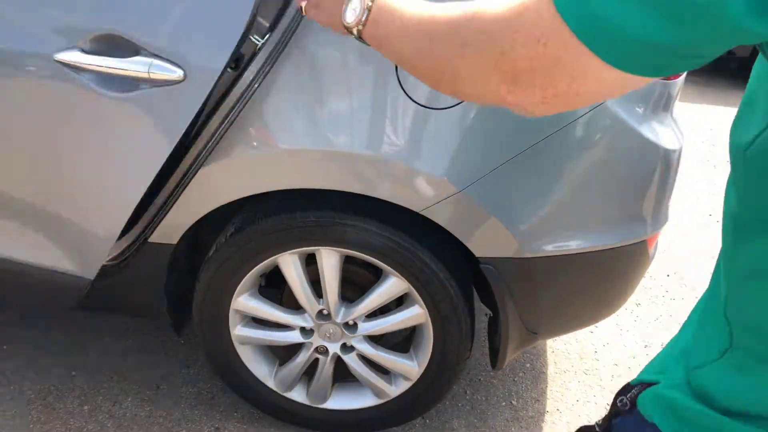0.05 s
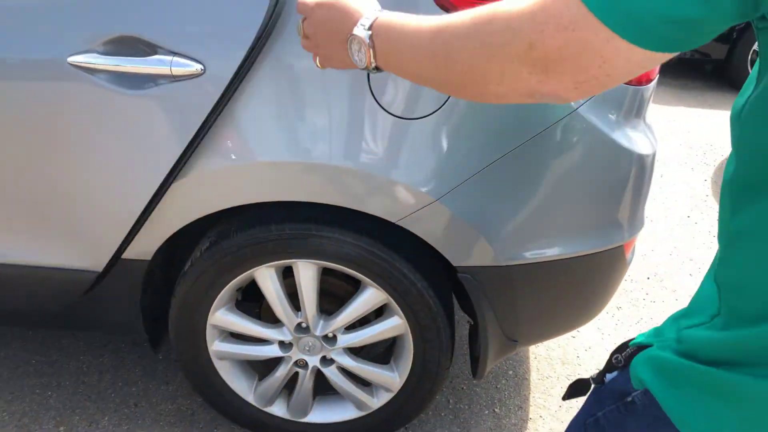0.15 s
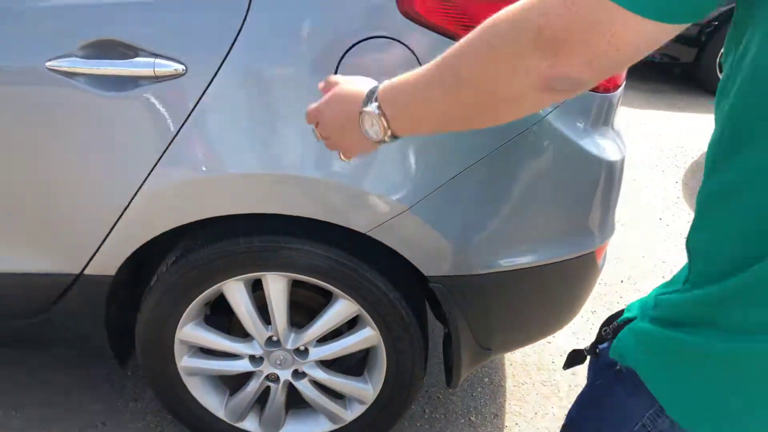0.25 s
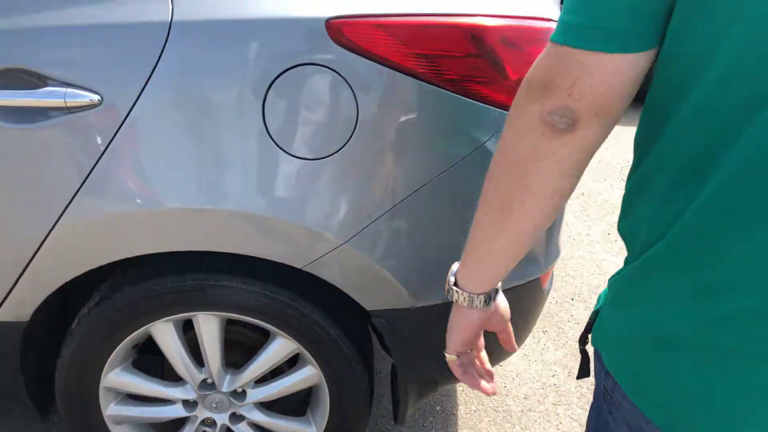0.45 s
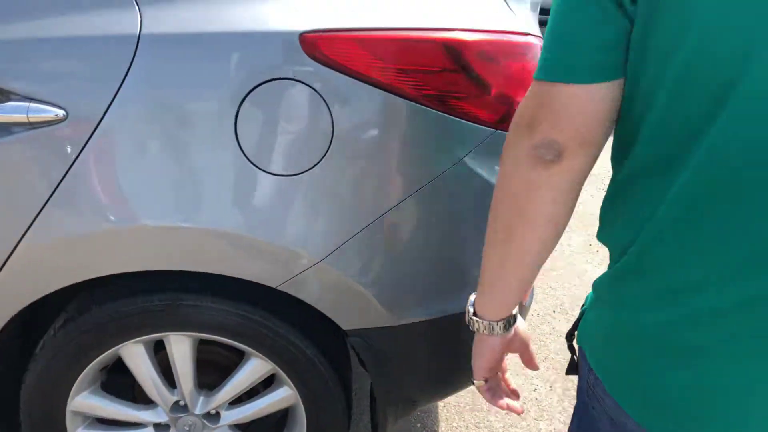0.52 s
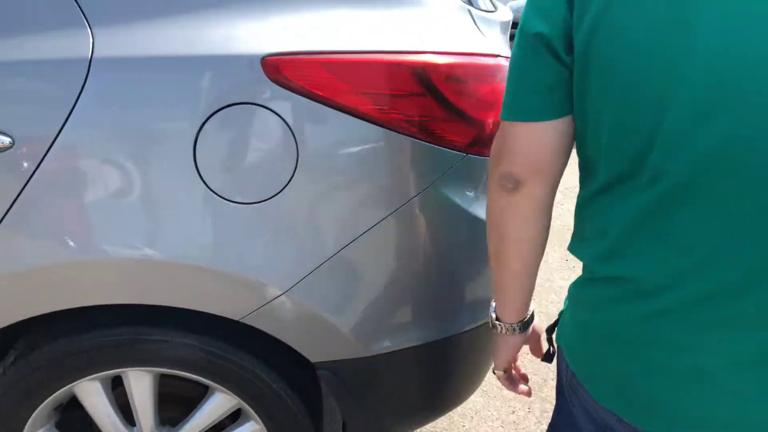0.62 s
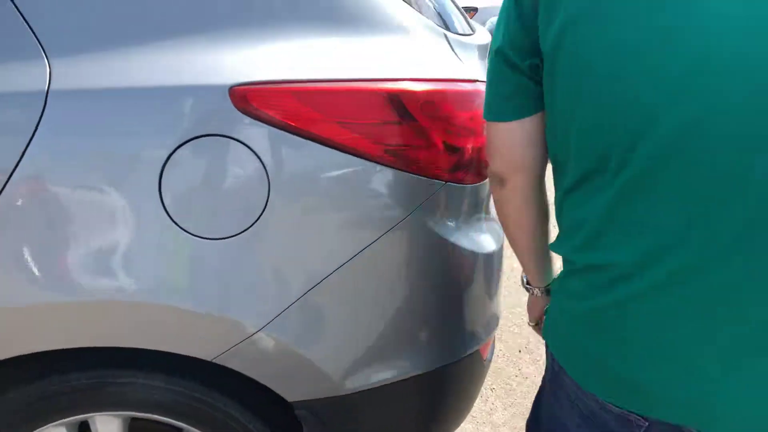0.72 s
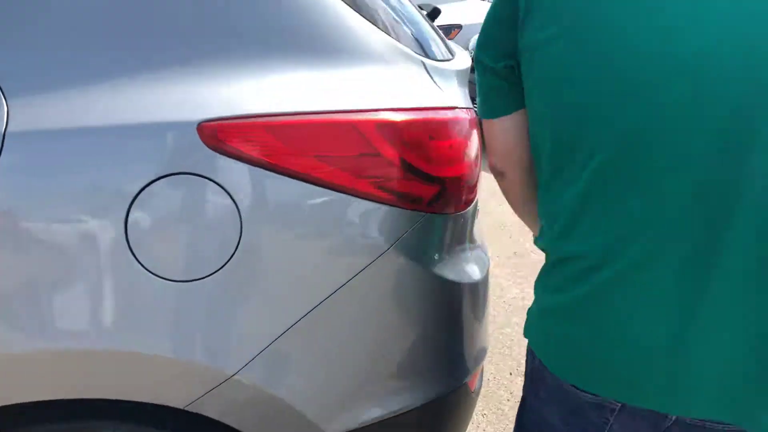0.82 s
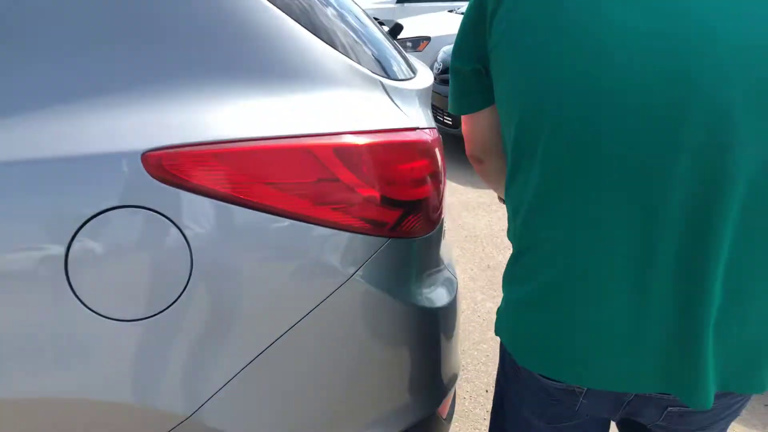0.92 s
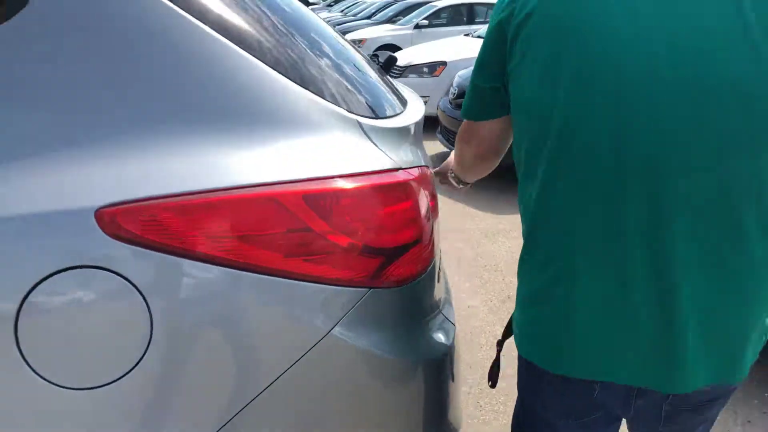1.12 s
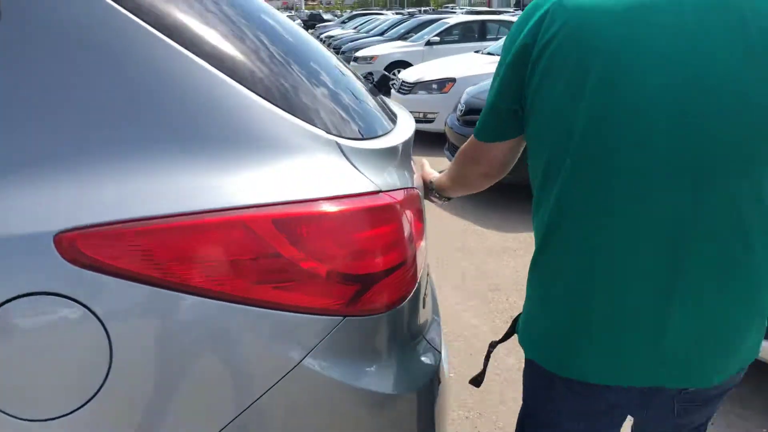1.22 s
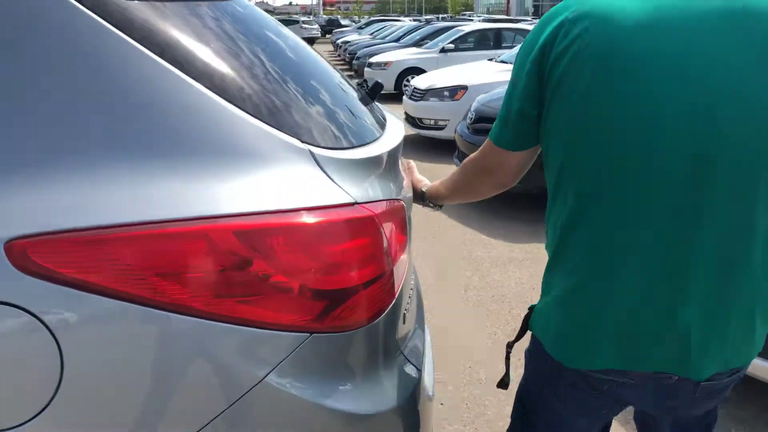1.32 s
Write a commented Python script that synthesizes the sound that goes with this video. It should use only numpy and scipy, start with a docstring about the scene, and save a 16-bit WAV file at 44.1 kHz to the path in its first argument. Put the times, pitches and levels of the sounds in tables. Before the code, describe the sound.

A car door is shut once close by, with a bright latch crunch and a deep, heavy thud. Distant traffic and an idling engine rumble steadily outdoors, and a faint shoe scuff and clothes rustle follow.

```python
"""Car door shut in a car park

A rear door is pushed shut about a metre away. It brushes its seal, the latch snaps in with a bright
crunch and the steel panels clunk; the body booms twice as the door seats and rebounds.
Far traffic and an idling engine rumble throughout, while clothes rustle and a shoe scuffs the asphalt.
Gain control ducks the whole scene on the slam and lets it creep back."""
import sys
import numpy as np
from scipy import signal
from scipy.fft import rfft, irfft
from scipy.io import wavfile

SR = 44100
rng = np.random.default_rng(int(sys.argv[2]) if len(sys.argv) > 2 else 0)


def bounce(signal):
    """Save signal as a 16-bit WAV file at the path given by the first command-line argument."""
    frames = np.transpose(np.atleast_2d(signal))
    limited = np.clip(frames, -1, 1)
    pcm = np.round(limited * 32767).astype(np.int16)
    wavfile.write(sys.argv[1], SR, pcm)


N = 59535
TIME = np.arange(N) / SR

# the door meets seal, latch and frame: t/s, level/dB, extra crunch/dB
DOOR_CONTACTS = [(.2272, -12.5, -6), (.2366, -14.5, 10), (0.2407, -8, 9.5), (.2460, 0, 4.5),
                 (0.2493, -0.5, -3), (0.2513, -5, 10), (.2695, -16, 11.5)]


def from_db(db):
    """Decibels to gain."""
    return 10 ** (np.asarray(db) / 20)


def unit_rms(x):
    """Scale to an rms of 1."""
    return x / np.sqrt(np.mean(x ** 2) + 1e-20)


def drift(rate_hz):
    """A smooth random wander, rms 1."""
    hop, settle = 100, 1000
    pole = np.exp(-2 * np.pi * rate_hz * hop / SR)
    white = rng.standard_normal(N // hop + settle + 2)
    slow = signal.lfilter([1], [1, -2 * pole, pole * pole], white)[settle:]
    return np.interp(np.arange(N) / hop, np.arange(len(slow)), unit_rms(slow))


def noise(colour):
    """Steady noise, rms 1, shaped by an EQ curve and rolled off below its first point."""
    hz, db = np.transpose(colour)
    bin_hz = np.maximum(np.arange(N // 2 + 1) * SR / N, 1)
    gain = from_db(np.interp(np.log(bin_hz), np.log(hz), db)) * np.minimum(bin_hz / hz[0], 1) ** 2
    return unit_rms(irfft(rfft(rng.standard_normal(N)) * gain, N))


def since(start):
    """Seconds since the start, zero before it."""
    return np.maximum(TIME - start, 0)


def decay(start, t60):
    """An envelope that jumps to 1, then falls 60 dB in t60 seconds."""
    return (TIME >= start) * np.exp(-np.log(1000) * since(start) / t60)


def burst(start, attack, t60):
    """A decay softened by a linear attack; times in seconds."""
    return np.minimum(since(start) / attack, 1) * decay(start, t60)


def ring(clicks, hz, t60):
    """A resonator: each click starts a dying sine of its own height."""
    pole, step = np.exp(-np.log(1000) / (t60 * SR)), 2 * np.pi * hz / SR
    return signal.lfilter([0, np.sin(step)], [1, -2 * pole * np.cos(step), pole * pole], clicks + 1e-18)


def panel_clunk(slam_s=0.2445):
    """The seal cushions the slam: each panel mode swells, then is damped by the rubber."""
    # door panel modes: f/Hz, level/dB, swell/s, t60/s
    panel_modes = [(172, -29, 0.0042, 0.092), (259.5, -15, 0.011, 0.052), (472, -12, 0.0058, 0.026),
                   (782, -18, 0.0049, 0.019)]
    age = since(slam_s)
    out = np.zeros(N)
    for hz, db, swell, t60 in panel_modes:
        attack = np.sin(np.pi / 2 * np.minimum(age / swell, 1)) ** 2
        damping = np.exp(-np.log(1000) * since(slam_s + swell) / t60)
        out += from_db(db) * attack * damping * np.sin(2 * np.pi * hz * age)
    return out


def steel_ring(spread_db=3):
    """Every contact rings the skin and latch, striking each mode with a slightly random strength."""
    # modes of the steel skin and latch: f/Hz, level/dB, t60/s
    steel_modes = [(206.4, -32.5, .28), (250.2, -31.5, .2), (409.4, -34, 0.17), (459, -28.5, 0.27),
                   (495, -36, .2), (795, -33, 0.27), (825, -38, 0.11), (975, -37, 0.12), (1405, -27, 0.038),
                   (1700, -42, 0.064), (2102, -39.5, 0.066), (2224, -36, 0.1), (2340, -36, .11),
                   (2390, -52, 0.068), (2805, -48, .07), (3125, -42.5, 0.096), (3503, -37, 0.044)]
    starts, contact_db, _ = np.transpose(DOOR_CONTACTS)
    out = np.zeros(N)
    for hz, mode_db, t60 in steel_modes:
        strike_db = contact_db + mode_db + spread_db * rng.standard_normal(len(starts))
        clicks = np.zeros(N)
        clicks[(starts * SR).astype(int)] = from_db(strike_db)
        out += ring(clicks, hz, t60)
    return out


def latch_crunch(attack_s=0.0022, trim_cutoff_hz=6100):
    """Each contact builds to a short bright crunch and leaves a duller shake of the trim."""
    # colour of latch and trim: f/Hz, relative level/dB
    crunch_colour = [(300, 4), (480, 2), (610, 1), (760, 9), (1050, 3), (2400, -1.5), (3600, -11.5),
                     (5000, -16.5), (7200, -14), (8500, -19.5), (12000, -16.5), (16000, -31)]

    def hits(t60):
        """One burst per contact, summed in power."""
        return np.sqrt(sum((from_db(db + extra_db) * burst(start, attack_s, t60)) ** 2
                           for start, db, extra_db in DOOR_CONTACTS))

    crunch = from_db(-24.5) * hits(t60=0.019) * noise(crunch_colour)
    lowpass = signal.butter(1, trim_cutoff_hz, fs=SR, output="sos")
    trim = from_db(-37) * hits(t60=0.19) * signal.sosfilt(lowpass, noise(crunch_colour))
    return crunch + trim


def body_boom(swell_s=0.01717, sharpness=8, overtone_ratio=2.08, overtone_db=-15):
    """The door pushes cabin air and body into two deep, brief swells; a low shudder dies slowly."""
    # the door seats, then rebounds: t/s, f/Hz, level/dB
    booms = [(0.2474, 68, -5.5), (.2820, 71.6, -11.5)]
    # colour of the shuddering body: f/Hz, relative level/dB
    shudder_colour = [(40, -14), (60, -8), (85, -1.5), (120, -5), (165, -9), (240, -21), (340, -49),
                      (640, -59.5)]
    out = from_db(-28) * noise(shudder_colour) * burst(start=0.252, attack=0.019, t60=1.28)
    for start, hz, db in booms:
        progress = since(start) / swell_s
        swell = (progress * np.exp(1 - progress)) ** sharpness   # peaks swell_s after the start
        phase = 2 * np.pi * hz * since(start)
        tone = np.sin(phase) + from_db(overtone_db) * np.sin(overtone_ratio * phase)
        out += from_db(db) * swell * tone
    return out


def door_hollow():
    """The hollow of the door gives a brief boxy hum on the rebound."""
    # colour of the cavity: f/Hz, relative level/dB
    cavity_colour = [(150, -23), (205, -1), (270, 9), (340, -10), (420, 1.5), (490, -3), (600, -11.5),
                     (1200, -49)]
    return from_db(-26.5) * noise(cavity_colour) * burst(start=0.2643, attack=0.013, t60=0.28)


def metal_chinks():
    """A small loose piece of metal rings as the door swings and again as it rebounds."""
    # knocks on the loose piece: t/s, level/dB
    chinks = [(0.058, -36), (0.2917, -37)]
    # its modes: f/Hz, level/dB, t60/s
    chink_modes = [(3910, -4, .05), (7050, -12, .025)]
    return sum(from_db(db + mode_db) * decay(start, t60) * np.sin(2 * np.pi * hz * since(start))
               for start, db in chinks for hz, mode_db, t60 in chink_modes)


def shoe_scuffs():
    """A sole drags grit over the asphalt in short bright scrapes."""
    # scrapes: t/s, level/dB, t60/s
    scuffs = [(.689, -45, 0.012), (0.6969, -39, 0.017), (0.7, -45, 0.023), (.7085, -42, 0.082),
              (1.082, -51.5, 0.094)]
    # colour of the grit: f/Hz, relative level/dB
    grit_colour = [(1500, -10), (3700, -10), (4400, 12.5), (5200, -2), (6000, -5), (9000, -13),
                   (16000, -13)]
    return noise(grit_colour) * sum(from_db(db) * decay(start, t60) for start, db, t60 in scuffs)


def clothes_rustle():
    """Cloth brushes on cloth in faint, airy swishes."""
    # bell-shaped swishes: t/s, level/dB, half-width/s
    swishes = [(0.057, -54, 0.0064), (0.463, -58, 0.023), (0.559, -57.5, 0.011), (0.72, -61, 0.02),
               (0.748, -60, .005), (1.087, -66, 0.0093), (1.286, -69, .04)]
    # colour of the cloth: f/Hz, relative level/dB
    cloth_colour = [(2000, -10), (5000, 9.5), (9000, 1), (13000, 8), (16000, -8)]
    envelope = sum(from_db(db) * np.exp(-((TIME - peak) / half) ** 2) for peak, db, half in swishes)
    return noise(cloth_colour) * envelope


def far_traffic(corner_s=0.823, crossfade_s=0.28):
    """A steady far roar that changes colour as the listener rounds the car."""
    # traffic heard beside the car: f/Hz, relative level/dB
    beside_colour = [(15, -65), (25, -44), (37, -22), (53, -3), (74, -1.5), (175, -11), (229, -18),
                     (263, -14), (416, -21), (451, -24), (658, -17.5), (935, -15), (2470, -28.5),
                     (4020, -31.5), (4360, -34.5), (11500, -46.5), (16000, -46)]
    # traffic heard past its rear corner: f/Hz, relative level/dB
    behind_colour = [(15, -62), (25, -16), (37, -15), (41, -5), (53, -10), (74, -4), (141, -9), (157, -15),
                     (217, -9), (285, -17), (317, -16), (516, -23.5), (935, -15.5), (2220, -29),
                     (4730, -31), (6720, -43), (16000, -56.5)]
    beside = from_db(-40.5) * noise(beside_colour)
    behind = from_db(-41.5) * noise(behind_colour)
    blend = np.clip((TIME - corner_s) / crossfade_s + 0.5, 0, 1)
    return np.sqrt(1 - blend) * beside + np.sqrt(blend) * behind


def idling_engine(wander_rad=0.68):
    """A low engine hum whose partials each waver a little in pitch."""
    # partials of the hum: f/Hz, rms level/dB
    partials = [(70, -46.5), (107.7, -49), (129.2, -50.5), (215.3, -61)]
    hum = np.zeros(N)
    for hz, db in partials:
        phase = 2 * np.pi * (hz * TIME + rng.random()) + wander_rad * drift(rate_hz=3.7)
        hum += np.sqrt(2) * from_db(db) * np.sin(phase)
    return hum


def scene():
    """Door, foley and the traffic bed, mixed to mono."""
    door = panel_clunk() + steel_ring() + latch_crunch() + body_boom() + door_hollow() + metal_chinks()
    foley = shoe_scuffs() + clothes_rustle()
    bed = far_traffic() + idling_engine()
    return (door + foley + bed)[None]


def record(dry):
    """The microphone drops the sub-bass, gain control ducks on the slam, and the top is cut steeply."""
    low_cut_hz, high_cut_hz = 38.5, 15800
    threshold_db, slope, attack_s, release_db_per_s = -14, 0.54, 0.0037, 5.5
    heard = signal.sosfilt(signal.butter(4, low_cut_hz, "high", fs=SR, output="sos"), dry)
    level_db = 20 * np.log10(np.abs(heard[0]) + 1e-9)
    duck_db = slope * np.maximum(level_db - threshold_db, 0)
    # hold the deepest duck and let it go at a steady rate
    release_db = release_db_per_s * TIME
    held_db = np.maximum.accumulate(duck_db + release_db) - release_db
    pole = np.exp(-1 / (attack_s * SR))
    ducked = heard * from_db(-signal.lfilter([1 - pole], [1, -pole], held_db))
    return signal.sosfilt(signal.ellip(10, 0.1, 80, high_cut_hz, fs=SR, output="sos"), ducked)


dry = scene()
out = record(dry)
bounce(out)
```